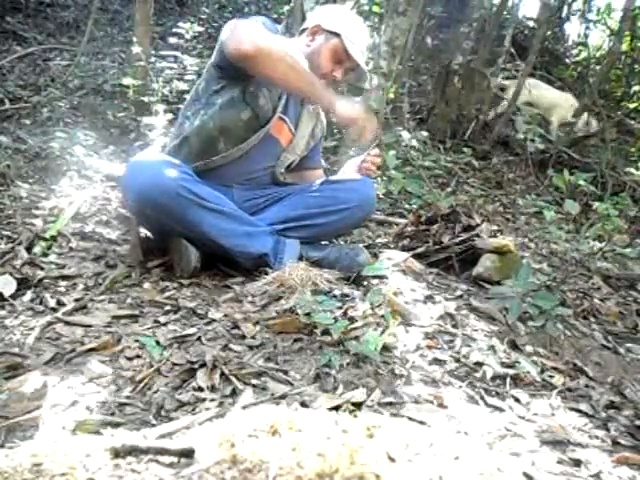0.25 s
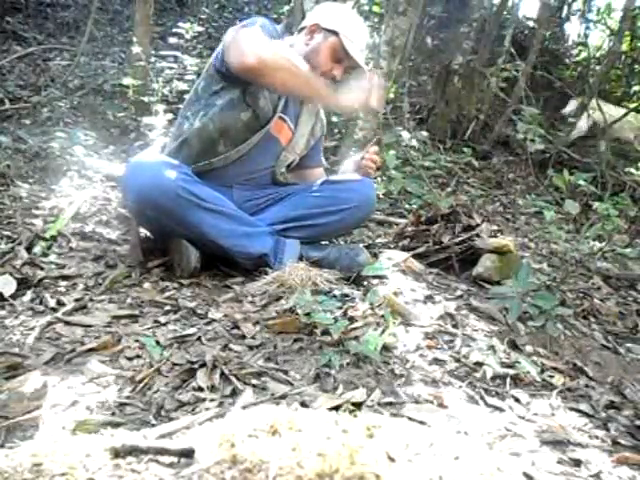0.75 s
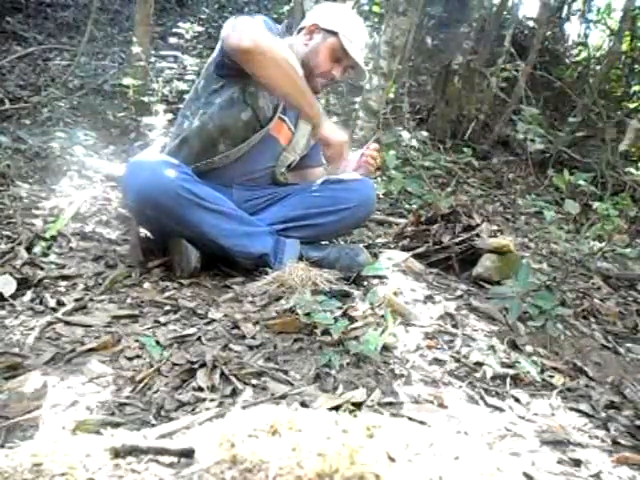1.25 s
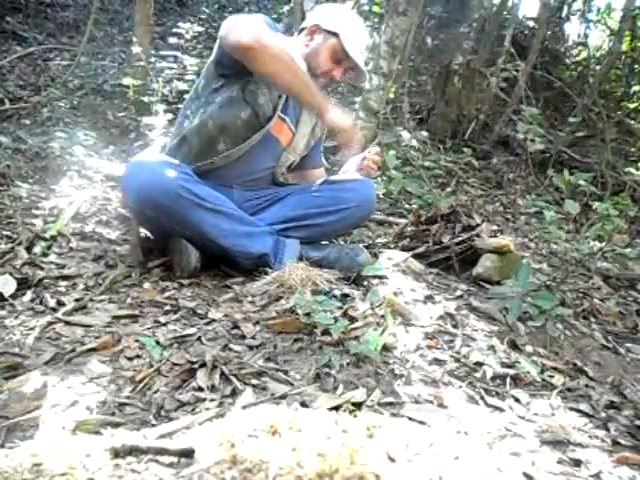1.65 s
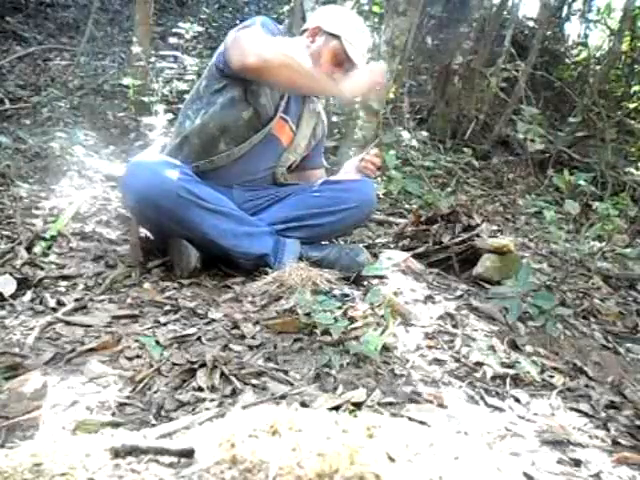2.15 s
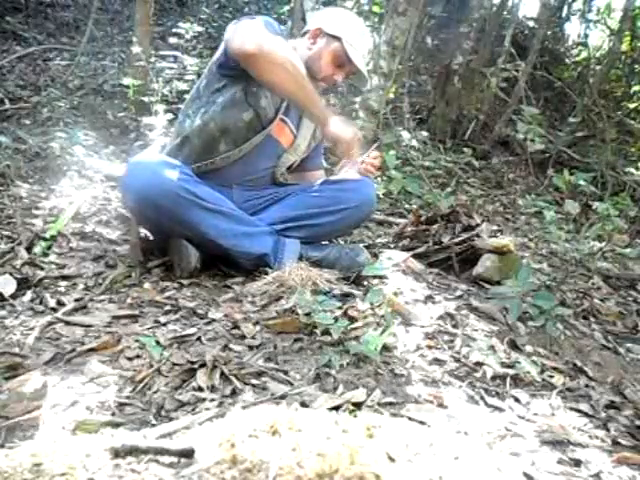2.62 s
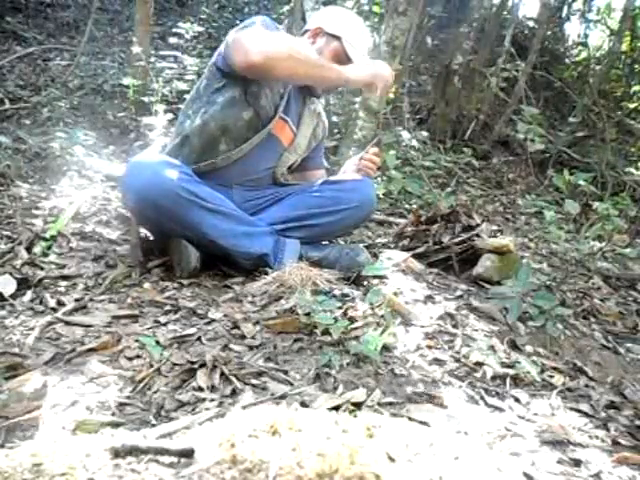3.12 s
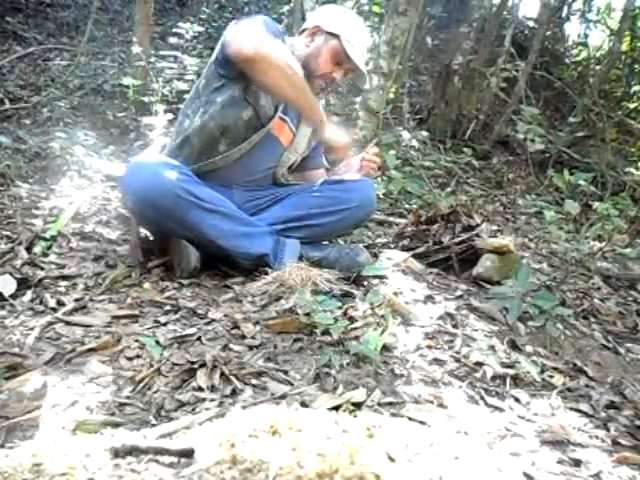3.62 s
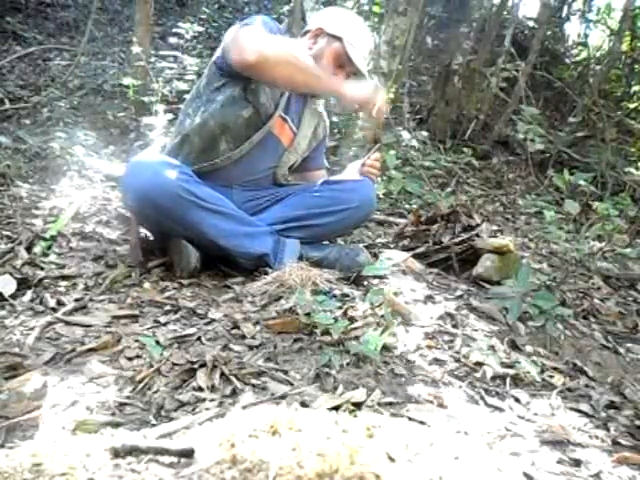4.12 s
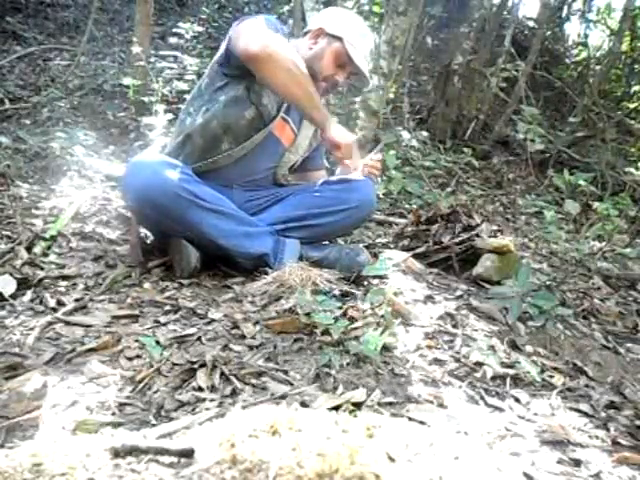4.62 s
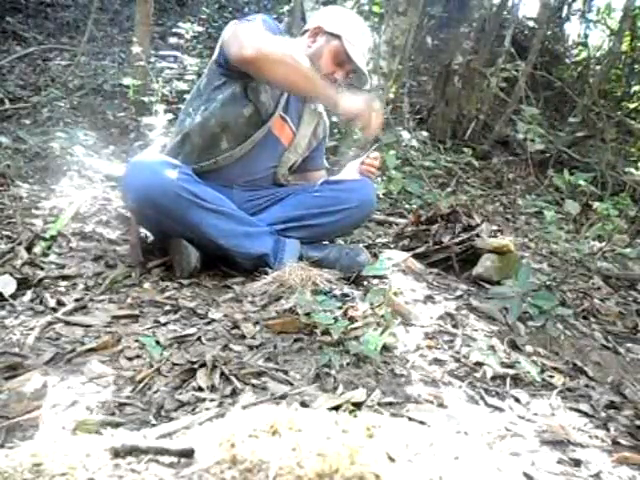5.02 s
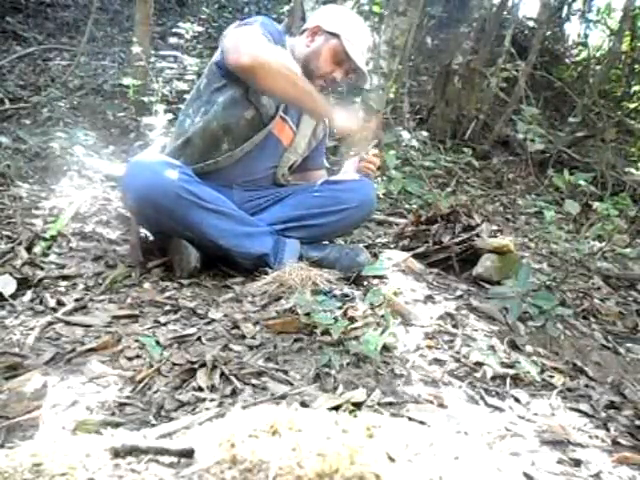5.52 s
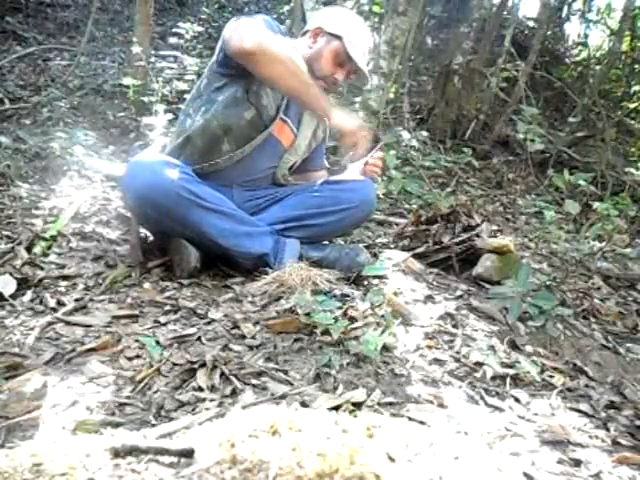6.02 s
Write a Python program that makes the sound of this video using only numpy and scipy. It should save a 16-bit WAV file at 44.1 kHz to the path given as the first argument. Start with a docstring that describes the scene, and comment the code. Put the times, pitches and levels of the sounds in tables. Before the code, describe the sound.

A few metres away in quiet woods, a man strikes steel against flint about three times a second. Each blow is a sharp tick with a tiny scrape, a brief high ring and a fizz of sparks. His clothes rustle softly with the swings. Two faint twig snaps, two distant chirps and, near the end, two dull bumps dot the steady forest hush.

```python
"""In the woods, a few metres away, a seated man strikes steel on flint about three times a second.
Each blow is a sharp tick and a tiny scrape that make the stone and steel ring briefly in his fingers.
Sparks fizz, and the ground, fallen leaves and trunks send faint echoes back. His clothes rustle with
every swing. Two twig snaps, two far chirps and two dull bumps dot the steady hush of the forest."""
import sys
import numpy as np
from scipy import signal
from scipy.fft import rfft, irfft
from scipy.io import wavfile

SR = 44100
rng = np.random.default_rng(int(sys.argv[2]) if len(sys.argv) > 2 else 0)


def dump_mix(stems):
    """Bounce the given channels to the path in sys.argv[1] as a 16-bit WAV at rate SR."""
    frames = np.atleast_2d(stems).T  # one column per channel
    limited = np.clip(frames, -1, 1)  # hard clip at full scale
    pcm = np.round(limited * 32767).astype(np.int16)
    wavfile.write(sys.argv[1], SR, pcm)


N = 276507

# blows of the steel: t/s, level/dB, scrape length/ms, brightness/(dB per octave), clink/dB, ring/dB
BLOWS = [(0.1558, -35.5, 2.64, -2.0, 4, 9.5), (0.4904, -38, 2.85, 1.07, 1, -4),
         (0.8048, -35.5, 2.35, -1.26, 2.5, -14.5), (1.2065, -34, 1.57, 0.1, 0, -3.5),
         (1.5576, -28.5, 2.87, 1.52, 1, -7), (1.9327, -35.5, 1.534, 1.8, -1.5, -13),
         (2.2474, -31.5, 2.7, 0.4, 0, 2.5), (2.589, -30.5, 3.1, -0.13, 1.5, -7),
         (2.9203, -33, 2.82, -1.09, 2.5, 8), (3.2639, -30, 2.67, 0.08, -1, -1),
         (3.6283, -28, 2.54, 0.27, -1, -2.06), (3.9879, -36, 3.06, 0, -1, -4.5),
         (4.2841, -34, 1.16, 0.5, -5.5, -0.85), (4.6013, -33.5, 3.65, -1.5, 0, 4.5),
         (4.9083, -31.5, 3.37, -0.76, 1, 3.5), (5.2198, -28.5, 2.05, 1.0, -1, 1.5),
         (5.5405, -30, 1.59, -0.5, -1.5, -1.5), (5.9315, -31.5, 3, 0.36, 1, 8)]
# natural tones of the hand-held flint and steel: f/Hz, level/dB, t60/s (time to fade by 60 dB)
TONES = [(340.7, -15, 0.00933), (502.7, -12.5, 0.00774), (912, -12, 0.0095), (1638.5, -9, 0.00624),
         (1922, -4, 0.00501), (2600, -0.5, 0.0074), (2665, -11.5, 0.0103), (3220, -16, 0.0079),
         (3610, -21.5, 0.079), (3858, -7.5, 0.00666), (4174, -9, 0.0073), (4537, -9, 0.0086),
         (5325, -5, 0.0064), (5642, -13.5, 0.0117), (6297, -30, 0.02), (7157, -9, 0.0139),
         (7974, -10, 0.017), (9570, -22.5, 0.014), (9938, -16, 0.0133), (10500, -50.5, 0.0051)]
CLINK_HZ, RING_HZ = 2700, 8000  # the stone's clink, the ring of the steel's free end


def undb(db):
    """Turn decibels into a factor to multiply by."""
    return 10 ** (np.asarray(db) / 20)


def unit(x):
    """Scale a sound to an average strength (rms) of 1."""
    return x / np.sqrt(np.mean(x ** 2) + 1e-20)


def seconds(length):
    """The time of each sample in a sound of this length."""
    return np.arange(int(length * SR)) / SR


def fade(t, t60):
    """A smooth fade that loses 60 dB in t60 seconds."""
    return np.exp(-np.log(1000) * t / t60)


def add(track, s, sound):
    """Mix a sound into the track, starting at s seconds."""
    i = int(round(s * SR))
    track[i:i + len(sound)] += sound[:N - i]


def band(x, lo_hz, hi_hz):
    """Gently turn down everything outside two frequencies."""
    edges = [lo_hz, min(hi_hz, SR / 2 - 100)]
    return signal.sosfilt(signal.butter(2, edges, "band", fs=SR, output="sos"), x)


def crackle(n, grit):
    """Noise of n samples; more grit makes it spikier."""
    noise, size = rng.standard_normal((2, n))
    return noise * np.exp(grit * size)


def forest_hush(level_db=-52, flutter_db=0.7745):
    """Distant leaves and air make a soft noise in which each octave wavers slightly."""
    # tone colour of the hush: f/Hz, relative level/dB
    hush_shape = [(15, -27.5), (25, -1.5), (274, -5), (362, -5), (391, -5.5), (468, -5), (603, -6.5),
                  (2160, -12.5), (2450, -12.5), (9930, -19.5), (11000, -28), (14300, -57), (22000, -120)]
    hz, db = np.transpose(hush_shape)
    f = np.maximum(np.arange(N // 2 + 1) * SR / N, 1)
    spectrum = rfft(rng.standard_normal(N)) * undb(np.interp(np.log(f), np.log(hz), db))
    octave = np.floor(np.log2(np.maximum(f, 64)))
    out = np.zeros(N)
    for k in np.unique(octave):
        drift = signal.resample(rng.standard_normal(64), N)
        drift_db = flutter_db * drift / (1 + 2 ** k / 2000)  # high octaves waver less
        out += irfft(spectrum * (octave == k), N) * undb(drift_db)
    return undb(level_db) * unit(out)


def swishes(table, spread, grit):
    """Many tiny touches blur into short swells of noise; width is the time spent above half height."""
    out = np.zeros(N)
    for middle, width, hz, db in table:
        swell = np.hanning(int(2 * width * SR))
        rubbing = unit(band(crackle(len(swell), grit), hz / spread, hz * spread))
        add(out, middle - width, undb(db) * swell * rubbing)
    return out


def clothes(usual_blow_db=-26.5, scatter_s=0.012, scatter_db=3):
    """Cloth rubs on every swing, never quite the same, and louder when the blow is harder."""
    # the arm comes down, stops and lifts: t after the blow/s, width/s, centre f/Hz, level/dB
    swing = [(-.04, .03, 646, -61), (.115, 0.031, 210, -62.5), (.18, 0.039, 620, -59.5)]
    swells = []
    for s, blow_db, *_ in BLOWS:
        effort_db = 0.49 * (blow_db - usual_blow_db)
        for after_s, width, hz, db in swing:
            late, louder = rng.standard_normal(2)
            swells.append((s + after_s + scatter_s * late, width, hz, db + effort_db + scatter_db * louder))
    return swishes(swells, spread=1.586, grit=0.31)


def contact(scrape_ms, scrape_db=4.5):
    """The push on the stone: one hard tick, then its edge tears chips from the sliding steel."""
    t = seconds(0.012)
    bite = 1 - np.exp(-t / 0.000269)
    slide_off = np.exp(-(1000 * t / scrape_ms) ** 4)
    chips = crackle(len(t), grit=0.371) * bite * slide_off
    force = undb(scrape_db) * chips / np.linalg.norm(chips)
    force[0] += 1  # the tick
    return force


def tone_boosts(bright_db, clink_db, ring_db, clink_width_hz=454, scatter_db=1.13):
    """Extra dB for each tone: a sharp contact favours high ones, and the grip sets clink and ring."""
    hz = np.array(TONES)[:, 0]
    boost_db = bright_db * np.log2(hz / CLINK_HZ)
    boost_db += scatter_db * rng.standard_normal(len(hz))  # each blow lands on a different spot
    boost_db += clink_db * np.exp(-((hz - CLINK_HZ) / clink_width_hz) ** 2)
    boost_db[np.argmin(abs(hz - 7100))] -= 0.426 * ring_db  # this tone shares energy with the free end
    boost_db[np.argmin(abs(hz - RING_HZ))] = ring_db
    return boost_db


def clack(force, boost_db, crack_db=-11):
    """The first touch is heard as a crack, and the push sets every tone of flint and steel ringing."""
    t = seconds(0.06)
    out = undb(crack_db) * unit(band(signal.unit_impulse(len(t)), 2000, 7000))
    for (hz, db, t60), extra_db in zip(TONES, boost_db):
        grip = 1 + 0.0049 * rng.standard_normal()  # the fingers shift the pitch a little
        tone = np.cos(2 * np.pi * hz * grip * t) * fade(t, t60)
        ringing = signal.fftconvolve(force, tone)[:len(t)]
        out += undb(db + extra_db) * unit(band(ringing, 0.5 * hz, 6258))  # small things give little bass
    return out / np.sqrt(t[-1] * 100)


def sparks(level_db=-23, t60=0.265):
    """Sparks and stone dust fizz away from the edge."""
    t = seconds(0.2)
    fizz = unit(band(crackle(len(t), grit=1.0), 1700, 7500))
    return undb(level_db) * fizz * fade(t, t60)


def ting(drive_db, hz=7995, offset_db=-23.5, t60=0.18):
    """The free end of the steel sings on with one pure note."""
    t = seconds(0.25)
    return undb(drive_db + offset_db) * np.sin(2 * np.pi * hz * t) * fade(t, t60)


def ground_echo(force, delay_s=0.0025, echo_db=-8):
    """The ground sends each blow back; the delay changes with the height of the hands."""
    lag = int(SR * delay_s * rng.uniform(0.75, 1.3))
    return force + undb(echo_db) * np.pad(force, (lag, 0))[:len(force)]


def strikes(clack_db=0.2637):
    """Steel hits flint: each blow gives a clack, a fizz of sparks and a ting."""
    out = np.zeros(N)
    for s, db, scrape_ms, bright_db, clink_db, ring_db in BLOWS:
        force = ground_echo(contact(scrape_ms))
        add(out, s, undb(db + clack_db) * clack(force, tone_boosts(bright_db, clink_db, ring_db)))
        add(out, s, undb(db) * sparks())
        add(out, s, ting(db + ring_db))
    return out


def forest_echoes(x, leaves_db=-16, leaves_t60=0.0706, trunks_db=-23, trunks_t60=0.4):
    """Fallen leaves scatter the sound back quickly, and far trunks add a thin tail."""
    # high-pitched echoes from a thin trunk nearby: delay/s, level/dB
    near_echoes = [(0.0165, -35), (0.0148, -37.5)]
    t = seconds(0.4)
    leaves = rng.standard_normal(len(t)) * fade(t, leaves_t60) * (t > 0.003)
    trunks = crackle(len(t), grit=0.39) * fade(t, trunks_t60) * (t > 0.018)
    response = undb(leaves_db) * leaves / np.linalg.norm(leaves)
    response += band(undb(trunks_db) * trunks / np.linalg.norm(trunks), 150, 8160)
    response[0] += 1  # the direct sound
    for delay, db in near_echoes:
        response += undb(db) * band(signal.unit_impulse(len(t), int(delay * SR)), 8700, 11000)
    return signal.fftconvolve(x, response)[:N]


def twigs():
    """Small dry twigs snap and ring for a moment."""
    # snaps: t/s, level/dB
    snaps = [(1.445, -51), (6.182, -44.5)]
    # natural tones of a twig: f/Hz, level/dB, t60/s
    wood_tones = [(862, 4.5, 0.0218), (2007, 6, 0.0148), (2330, -2, 0.016)]
    out, t = np.zeros(N), seconds(0.05)
    snap = sum(undb(db) * np.sin(2 * np.pi * hz * t) * fade(t, t60) for hz, db, t60 in wood_tones)
    for s, db in snaps:
        add(out, s, undb(db) * snap)
    return out


def chirps(waver=0.06):
    """Faint, far whistles waver as they slide upward."""
    # whistles: t/s, length/s, start f/Hz, end f/Hz, level/dB
    whistles = [(1.754, 0.0405, 869, 1312, -56), (3.011, 0.0548, 2530, 2600, -52.5)]
    out = np.zeros(N)
    for s, length, start_hz, end_hz, db in whistles:
        t = seconds(length)
        wobble = unit(band(rng.standard_normal(len(t)), 59, 295))
        pitch = np.linspace(start_hz, end_hz, len(t)) * (1 + waver * wobble)
        swell = np.sin(np.pi * t / length)
        add(out, s, undb(db) * unit(swell * np.sin(2 * np.pi * np.cumsum(pitch) / SR)))
    return out


def rustles():
    """Now and then clothes and leaves rub more loudly."""
    # rustles: middle t/s, width/s, centre f/Hz, level/dB
    rubs = [(2.443, 0.0276, 440, -48.5), (2.875, .05, 690, -54), (3.04, 0.0614, 450.4, -54.5),
            (3.44, .055, 620, -49.5), (3.442, 0.039, 2700, -54), (4.135, 0.0474, 650, -52.5)]
    return swishes(rubs, spread=1.546, grit=0.463)


def grazes(scrape_ms=3.12):
    """Just after a few of the blows, the steel brushes the stone again; about 16 ms after the blows at 4.60 s
    and 4.91 s, further bright ticks sound."""
    # light touches and later bright ticks: t/s, level/dB, brightness/(dB per octave)
    touches = [(4.609, -48.5, -1.5), (4.6175, -51, 9.5), (4.6220, -55.5, 6), (4.9135, -44.5, 1),
               (4.923, -56, 13.5), (5.549, -54.5, 12)]
    out = np.zeros(N)
    for s, db, bright_db in touches:
        ring_db = bright_db * np.log2(RING_HZ / CLINK_HZ)
        add(out, s, undb(db) * clack(contact(scrape_ms), tone_boosts(bright_db, 0, ring_db)))
    return out


def bumps():
    """Dull bumps on the ground, made of short swells of low noise."""
    # bumps: middle t/s, width/s, centre f/Hz, level/dB
    thuds = [(5.34, 0.032, 130, -47.5), (5.632, .03, 170, -51)]
    return swishes(thuds, spread=2.08, grit=0.14)


def scene(gap_hz=2370, gap_width_hz=90):
    """Mix all the sounds, the same for left and right."""
    soft_sounds = clothes() + rustles() + bumps()
    # just below the stone's clink, neighbouring tones cancel and leave a narrow gap
    gap = signal.iirnotch(gap_hz, gap_hz / gap_width_hz, SR)
    flint = signal.lfilter(*gap, strikes() + grazes())
    mono = forest_echoes(flint + twigs()) + soft_sounds + chirps() + forest_hush()
    return np.array([mono, mono])


def record(dry, top_hz=10900):
    """A steep filter cuts off the very highest sounds."""
    return signal.sosfilt(signal.ellip(10, 0.2, 80, top_hz, fs=SR, output="sos"), dry)


dry = scene()
out = record(dry)
dump_mix(out)
```